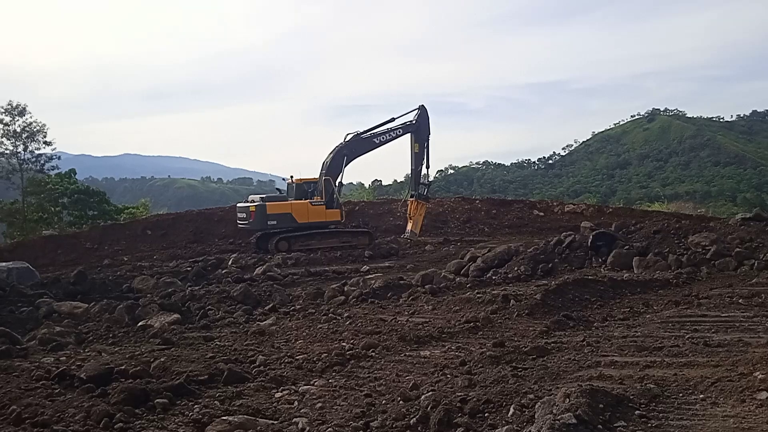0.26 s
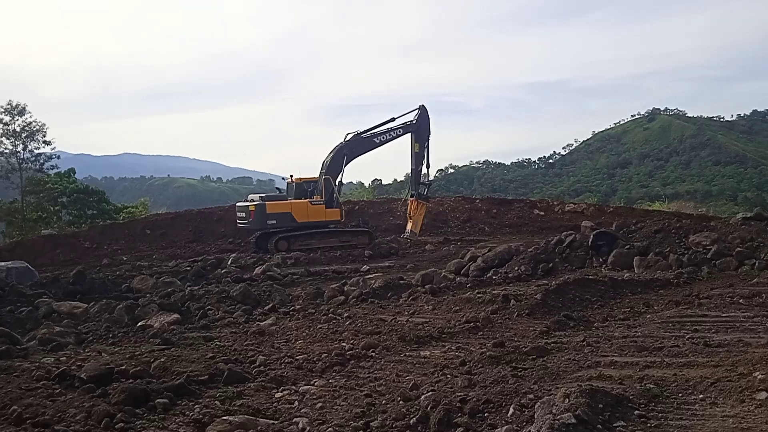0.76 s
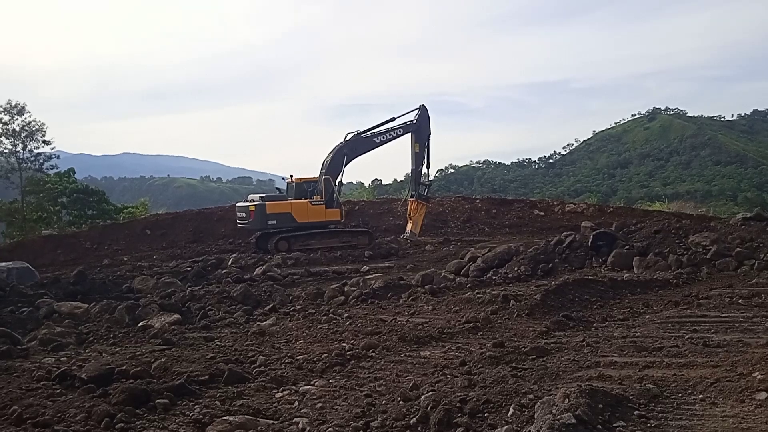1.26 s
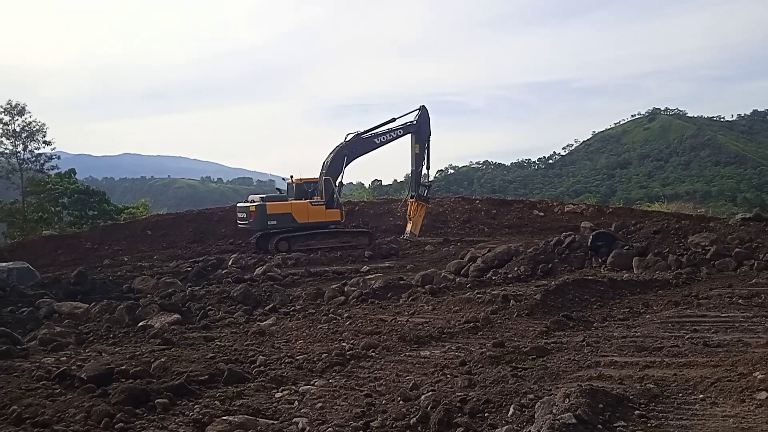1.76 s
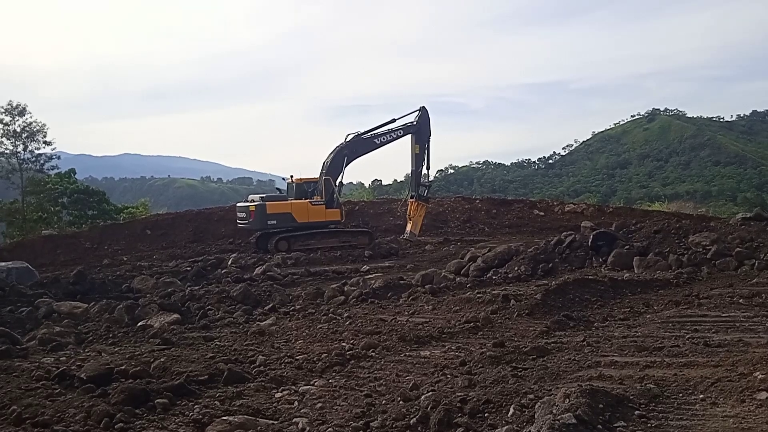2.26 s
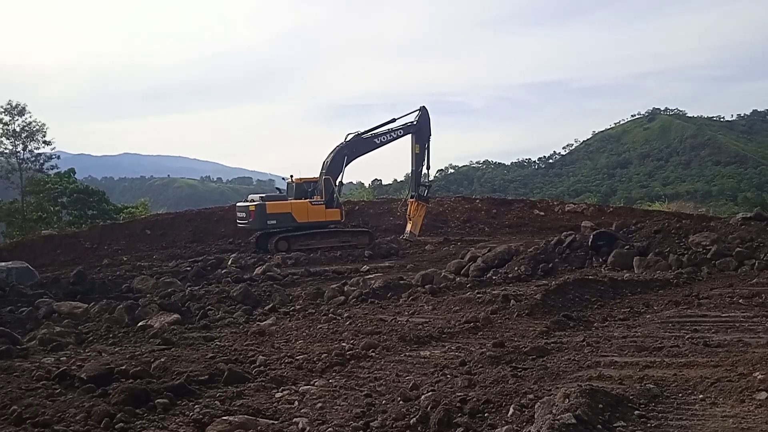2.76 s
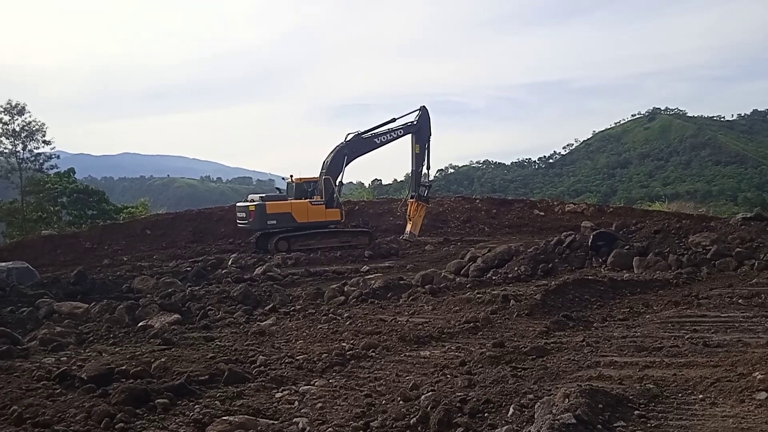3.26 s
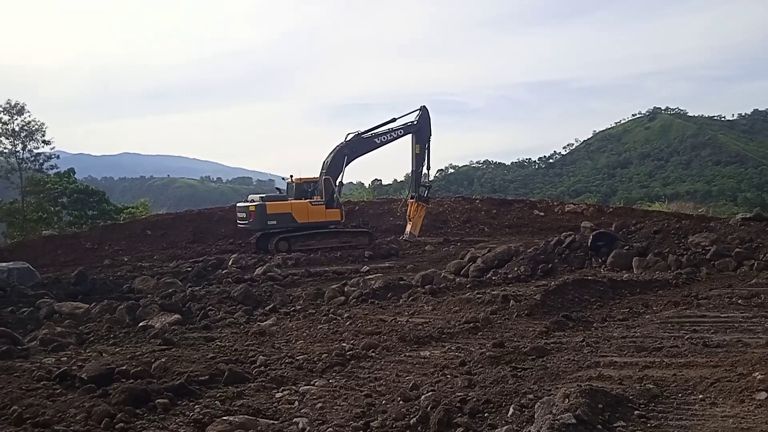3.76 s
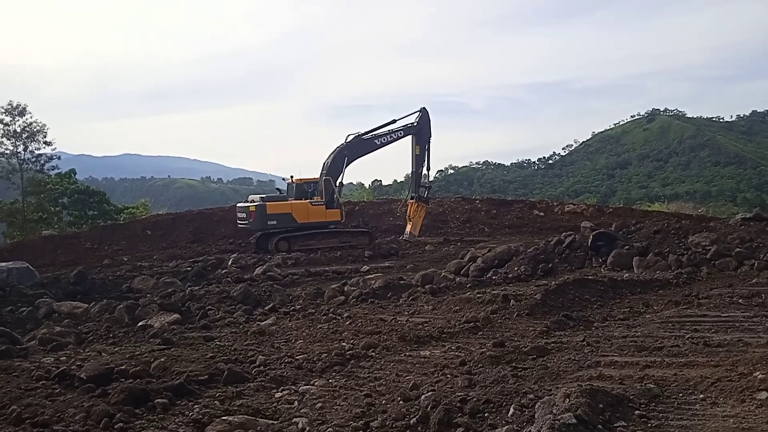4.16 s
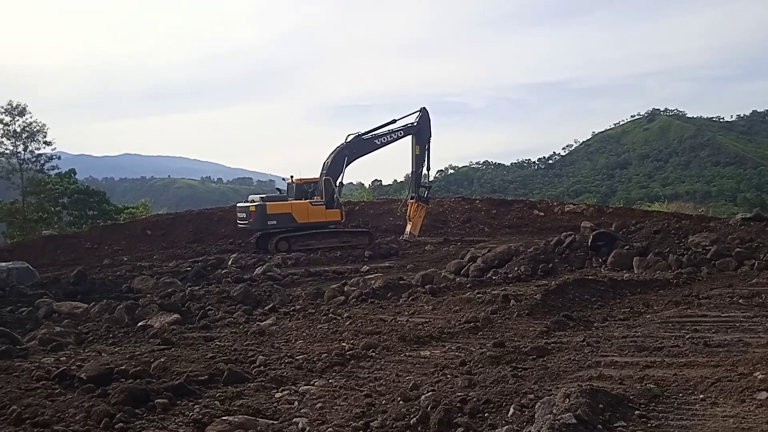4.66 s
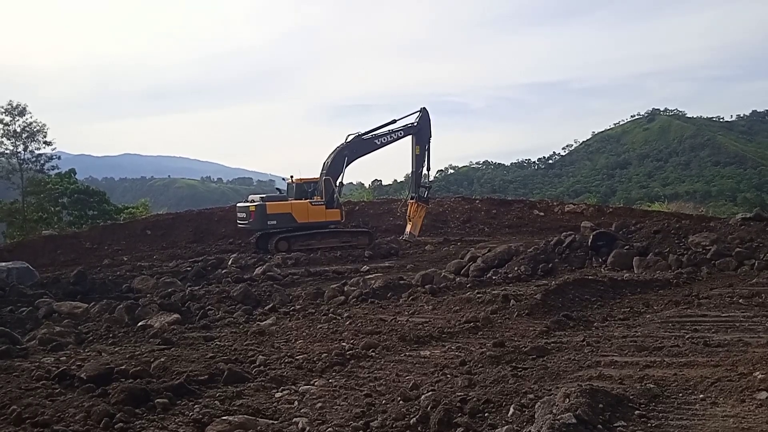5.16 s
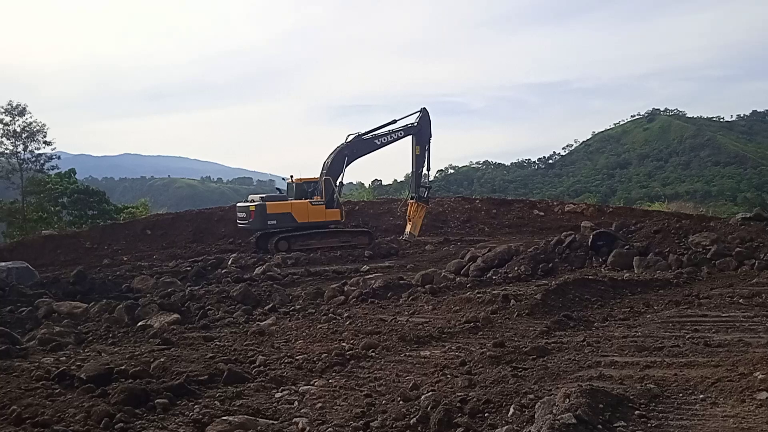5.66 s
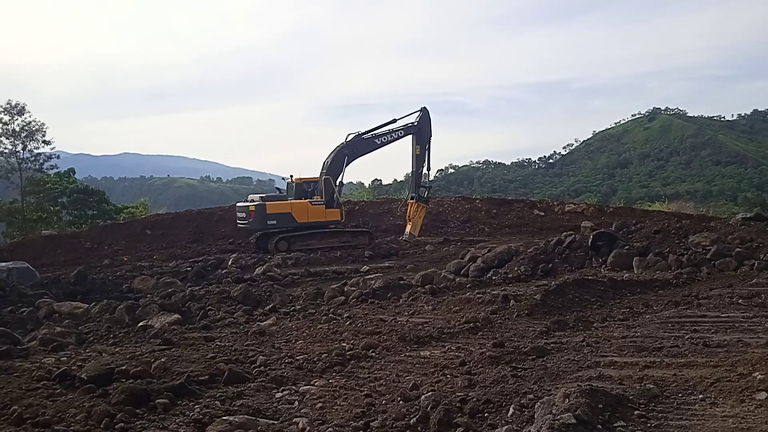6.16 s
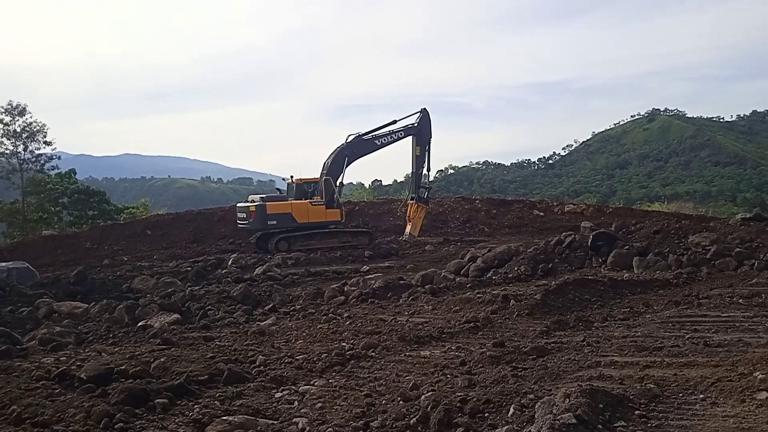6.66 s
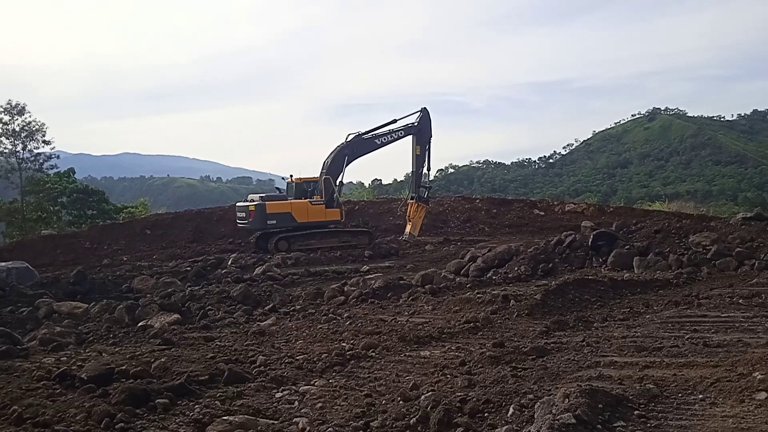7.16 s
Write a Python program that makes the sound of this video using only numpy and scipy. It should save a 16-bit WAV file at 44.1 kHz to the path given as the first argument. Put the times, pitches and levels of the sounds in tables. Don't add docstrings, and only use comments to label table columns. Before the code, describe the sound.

Outdoors at a rocky earthworks site, an excavator's hydraulic breaker pounds rock at about eight hard, ringing blows a second. The chisel soon works loose, adding double knocks, clanks and bright pings. Just past four seconds the hammering gives way to lone steel knocks, then resumes to the end. A low diesel drone runs throughout. A small microphone at some distance picks up faint, dull echoes and little deep bass.

```python
import sys
import numpy as np
from scipy import signal
from scipy.io import wavfile
from scipy.ndimage import uniform_filter1d

SR = 44100
rng = np.random.default_rng(int(sys.argv[2]) if len(sys.argv) > 2 else 0)


def nominal_scale(level):
    x = np.asarray(level, float) / 20
    return 10 ** x


def generate_wav(sig):
    pcm = np.round(np.clip(np.atleast_2d(sig).T, -1, 1) * 32767).astype(np.int16)
    wavfile.write(sys.argv[1], SR, pcm)


N = 326781
LENGTH = round(.26 * SR)
EDGES_HZ = 35 * 2 ** (np.arange(28) / 3)

# start_s, blow_count, spacing_s
BLOW_RUNS = [
    (.048, 7, .1302),
    (.959, 7, .1293),
    (1.865, 5, .1297),
    (2.513, 14, .1306),
    (4.948, 2, .13),
    (5.215, 5, .1293),
    (5.861, 13, .12863),
]
# time_s, strength_db, edge_db (re strength), boom_db (re strength)
CHISEL_BITE = [(0, -25.5, -3, -11), (.7, -25.5, -1.5, -10.5), (1.2, -26.5, -1, -1.5),
               (1.7, -24.5, -2, -5.5), (2.1, -26.5, -2.5, -3), (2.45, -23, -4.5, -6.5),
               (2.75, -27.5, -4, -15.5), (3.15, -25.5, -3.5, -8.5), (3.7, -25.5, -2.5, -5.5),
               (4.25, -26.5, -5.5, -4), (4.95, -28, -1.5, -7.5), (5.15, -29.5, 1, 0),
               (5.5, -28.5, -1.5, -3), (5.85, -29, 1.7, -3), (6.4, -29, -0.5, -6.5),
               (6.75, -30, -2.3, -6.5), (7.05, -30, -4.5, -6.5), (7.41, -23.5, -5.5, -8)]
UNEVEN_DB = 1.25
# pitch_hz, level_db (per Hz)
BLOW_COLOUR = [(76, -30), (130, 15), (263, -9.5), (501, -2.5), (678, -17), (954, 5.5), (1100, -35),
               (1320, 2), (2090, -4), (2460, -2.5), (3750, -7), (4320, -18), (6600, -9), (10100, -26),
               (16000, -27.5)]
# pitch_hz, hold_s, t60_s
BLOW_SUSTAIN = [(150, 0.029, 0.24), (503, 0.013, 0.73), (926, 0.02, 0.23), (2020, 0.014, 0.14),
                (4100, 0.016, 0.18), (8050, 0.0052, 0.12), (15900, 0.0043, 0.15)]
# pitch_hz, width_hz, level_db
HOUSING_MODES = [(987, 24, 5), (1190, 20, -2), (1340, 32, 3), (1520, 50, -1), (1930, 40, -6),
                 (2263, 20, -4), (2397, 26, 7), (2550, 26, -3), (2870, 60, -9), (3260, 38, -7),
                 (3480, 220, -6), (3710, 45, -1), (4150, 40, -8), (4740, 33, -8), (5070, 100, -9),
                 (5510, 40, 2), (6400, 45, -3), (6540, 50, -5), (6930, 40, -8), (7250, 70, -6),
                 (8830, 60, -5), (9310, 50, -2)]
# pitch_hz, level_db, t60_s
GROUND_MODES = [(96.5, 3, 0.13), (127.5, -2, 0.13), (142.4, -2.5, 0.1), (157.8, 2.5, 0.11),
                (198, -15, 0.24)]
# pitch_hz, level_db, t60_s
PLATE_MODES = [(346, 1.5, 0.25), (395.2, -0.5, 0.23), (428.8, 7, 0.14), (455.7, 1.5, 0.12),
               (543.6, -3, 0.25)]
# pitch_hz, level_db, t60_s
ARM_MODES = [(501.9, 0, 0.41)]
# time_s, ground_db, plates_db, arm_db
SEAT_SHARES = [(0, -9, -11, 2), (.35, -36, -2, -2.5), (.8, -2, -5, -7.5), (1.25, -0.5, -41, -3),
               (1.8, -4.5, -14, -15), (2.2, 1.5, -15, -15), (2.8, 8, 4.5, 6), (3.4, 3.5, -5.5, -14),
               (3.9, -2.5, -9.5, -4), (4.25, 2, -13, -4.5), (4.95, 0, -8.5, 0.5), (5.3, -4.5, -14, -11),
               (6.0, -7, -7.5, -6), (6.6, 1, -5.5, -14), (6.9, -15, -3.5, 0), (7.41, -9, -11, 1)]

# pitch_hz, level_db (per Hz)
VALVE_COLOUR = [(880, -9), (1500, -8), (3280, -8.5), (4480, -18.5), (7320, -6.5), (15500, -41), (16500, 13)]
VALVE_LEAD_S, VALVE_DB, VALVE_SCATTER_DB = .028, -47, 1.2
# time_s, level_db
REBOUND_HITS = [(.083, -36), (2.418, -47), (2.548, -34.5), (2.679, -29.5), (3.071, -47), (3.201, -45),
                (3.333, -27.5), (3.463, -41), (3.593, -31.5), (3.723, -26.5), (3.854, -31), (3.984, -34),
                (4.116, -34.5), (4.246, -32)]
# time_s, peak_db
LONE_KNOCKS = [
    (2.2243, -26.5),
    (2.8531, -26.5),
    (3.4639, -22),
    (4.411, -25),
    (4.568, -25.5),
    (4.7581, -43),
    (4.795, -26.5),
    (4.8994, -55),
    (5.1897, -34),
]
# pitch_hz, level_db (per Hz)
KNOCK_COLOUR = [(180, -35), (300, -15), (460, -1.5), (800, -2), (2480, -2.5), (4390, -7.5), (6030, -3),
                (9980, -19.5), (12500, -28), (16500, -16)]
# pitch_hz, level_db, t60_s
LOOSE_PLATE = [(615, 3, 0.59), (1347, -1, 0.68), (2450, -6, 0.22), (3070, 5, .25)]
# pitch_hz, t60_s
PIN_MODES = [(3250, .23), (5915, .17), (9310, .09)]
# time_s, low_mode_db, middle_mode_db, high_mode_db
PIN_HITS = [(2.222, -37, -28.5, -63), (2.29, -44, -53, -87), (2.42, -55, -38, -60), (2.55, -37, -35, -63),
            (2.689, -36, -35, -59), (2.931, -40, -46, -50), (3.06, -44, -51, -44), (3.256, -39, -42, -65),
            (3.34, -31, -37, -68), (3.378, -37, -60, -70), (3.466, -43, -31, -60), (3.601, -42, -33, -58),
            (3.711, -30.5, -30, -62), (3.799, -27.5, -40, -61), (3.861, -50, -34, -58),
            (3.89, -31, -55, -65), (3.985, -35, -37, -62), (4.12, -67, -36, -62), (4.252, -38, -41, -52),
            (4.409, -45, -33, -62), (4.567, -52, -33, -46), (4.793, -48, -40, -57)]
# pitch_hz, level_db, t60_s
LINK_MODES = [(4307, 2, 0.27), (6400, 3, 0.15), (7445, 2, 0.38), (8300, 7.5, 0.14), (8730, -7, 0.11),
              (11000, -5.5, 0.25), (11420, -7, 0.32), (13300, -10, .25), (13750, -4, 0.28),
              (14230, -11, .25), (14790, -7, 0.48), (15400, -14, .2)]
# time_s, level_db
LINK_STRIKES = [
    (3.258, -61),
    (3.34, -58),
    (3.757, -39.5),
    (3.80, -51),
    (3.869, -52),
    (4.25, -61),
]
# pitch_hz, level_db, t60_s
COLLAR_MODES = [(5510, 0, .13)]
# time_s, level_db
COLLAR_STRIKES = [(0.584, -46), (0.843, -49), (.975, -39), (2.65, -48), (2.786, -32), (3.045, -31),
                  (3.18, -29), (3.572, -29), (5.09, -47), (6.639, -32), (7.044, -37)]
CHATTER_DB = 1.6
# time_s, level_db
GRIT_LEVEL = [(0, -47), (3.2, -52), (3.35, -52), (3.75, -41.5), (4.2, -50.5), (4.35, -57), (7.41, -54)]

# time_s, firing_hz
ENGINE_SPEED = [(0, 74.3), (.3, 78.2), (.6, 80.5), (1.0, 85.05), (1.3, 84.3), (1.6, 81.7), (2.05, 80.34),
                (2.5, 82), (2.9, 85.6), (3.2, 86.2), (3.6, 83.66), (4.1, 81.5), (4.4, 84.76), (4.95, 89),
                (5.2, 88.8), (5.5, 88), (6.8, 89.1), (7.41, 89.2)]
# pitch_hz, level_db (rms)
EXHAUST_PIPE = [(80, -39), (152, -45), (168, -49), (177, -42), (228, -48), (243, -45), (256, -58.5),
                (266, -51.5)]
FUEL_DB_PER_HZ_S = 0.2359
# pitch_hz, level_db (per Hz)
ROAR_COLOUR = [(18, -48), (30, -36), (53, -6.5), (100, -6.5), (273, -10), (328, -20.5), (1130, -28),
               (1330, -22), (1550, -51), (2900, -27), (3310, -35), (3580, -54), (6050, -32), (6720, -43),
               (10000, -55), (16000, -52)]
# time_s, level_db
ROAR_LEVEL = [(0, -34.5), (1.0, -41.5), (2.0, -43), (3.0, -39.5), (4.3, -42), (5.0, -40.5), (6.0, -39.5),
              (7.41, -42)]
# time_s, pitch_hz, level_db
TURBO_WHINE = [(0, 9660, -71), (2.2, 9650, -73), (2.6, 9650, -88), (4.5, 9750, -84), (7.41, 9750, -88)]
# pitch_hz, width_hz, gain_db
MICROPHONE_PORT = [(12900, 2600, -7), (15200, 1600, 5)]


def in_time(rows):
    s, *columns = np.transpose(rows)
    return [np.interp(np.arange(N) / SR, s, column) for column in columns]


def at_times(rows, s):
    return [column[(s * SR).astype(int)] for column in in_time(rows)]


def at_hz(points, hz, axis=1):
    table = np.array(points)
    return np.interp(np.log(hz), np.log(table[:, 0]), table[:, axis])


def rms_one(x):
    return x / np.sqrt(np.mean(x ** 2) + 1e-20)


def drift(rate):
    r = np.exp(-80 * np.pi * rate / SR)
    noise = rng.standard_normal(N // 40 + 2002)
    slow = signal.lfilter([1], [1, -2 * r, r * r], noise)[2000:]
    return np.interp(np.arange(N) / 40, np.arange(len(slow)), rms_one(slow))


def creeping(count, *shape, alike):
    alike = np.clip(alike, 0, .98)
    fresh = rng.standard_normal((count + 10, *shape))
    return signal.lfilter([np.sqrt(1 - alike ** 2)], [1, -alike], fresh, axis=0)[10:]


def bands(x, low_hz):
    for k, (low, high) in enumerate(zip(EDGES_HZ, EDGES_HZ[1:])):
        if low > low_hz:
            band_pass = signal.butter(2, [low, high], "band", fs=SR, output="sos")
            yield np.sqrt(low * high), signal.sosfilt(band_pass, x[k % 2])


def envelope(rise, hold, t60):
    t = np.arange(LENGTH) / SR
    late = 0.0068 * np.logaddexp(0, (t - hold) / 0.0057)
    return (1 - np.exp(-t / rise)) * nominal_scale(-60 * late / t60)


def place(times, sounds):
    out = np.zeros(N + 2 * LENGTH)
    for s, sound in zip(times, sounds):
        at = max(round(s * SR), 0)
        out[at:at + LENGTH] += sound
    return out[:N]


def resonate(x, modes, spread_db):
    out = 0
    lucks = creeping(x.shape[-2], len(modes), alike=.55).T
    for (hz, width_hz, level_db), luck in zip(modes, lucks):
        r = np.exp(-np.pi * width_hz / SR)
        ringing = signal.lfilter([1, 0, -1], [1, -2 * r * np.cos(2 * np.pi * hz / SR), r * r], x)
        gain = nominal_scale(level_db + spread_db * luck)[:, None]
        out = out + gain * (1 - r * r) / 2 * ringing
    return out


def knocks(times, level_db, colour, hold, t60):
    noise = rng.standard_normal((2, len(times), LENGTH))
    parts = [(hz, nominal_scale(at_hz(colour, hz)) * band) for hz, band in bands(noise, colour[0][0])]
    whole = np.sqrt(np.mean(sum(part for hz, part in parts) ** 2))
    dying = sum(part * envelope(.001, hold, t60 * (3000 / hz) ** .6) for hz, part in parts)
    return place(times, nominal_scale(level_db)[:, None] * dying / whole)


def struck(times, level_db, modes, spread_db, alike, rise):
    t = np.arange(LENGTH) / SR
    hz, mode_db, t60 = np.transpose(modes)[:, :, None]
    twins = np.sin(2 * np.pi * hz * t) + .45 * np.sin(2 * np.pi * hz * 1.005 * t)
    dying = nominal_scale(mode_db - 60 * t / np.clip(t60, .03, .45))
    rings = twins * dying * (1 - np.exp(-t / rise))
    luck = creeping(len(times), len(modes), alike=alike)
    return place(times, nominal_scale(np.array(level_db)[:, None] + spread_db * luck) @ rings)


def strokes():
    s = np.concatenate([first + pace * np.arange(count) for first, count, pace in BLOW_RUNS])
    strength_db, edge_db, boom_db = at_times(CHISEL_BITE, s)
    strength_db = strength_db + UNEVEN_DB * rng.standard_normal(len(s))
    return np.array([s, strength_db, edge_db, boom_db])


def rattle(count, alike, lumps_db):
    lumps = uniform_filter1d(creeping(count, LENGTH, alike=alike), size=90, axis=-1)
    noise = creeping(count, 2, LENGTH, alike=alike).transpose(1, 0, 2)
    return noise * nominal_scale(lumps_db * rms_one(lumps))


def blows(hits):
    s, strength_db, edge_db, boom_db = hits[:, :, None]
    contact = rattle(count=len(s), alike=.75, lumps_db=2)
    contact = contact + nominal_scale(8) * resonate(contact, HOUSING_MODES, spread_db=2)
    contact = contact * (1 - .5 * np.exp(-np.arange(LENGTH) / SR / .009))
    out = 0
    for hz, band in bands(contact, low_hz=200):
        bright_db = np.clip(np.log2(hz / 3500), 0, 1) * (edge_db + 6.5)
        deep_db = np.clip(np.log2(900 / hz), 0, 1) * (boom_db + 7.0)
        hold, t60 = at_hz(BLOW_SUSTAIN, hz), at_hz(BLOW_SUSTAIN, hz, axis=2)
        shape = envelope(0.00095 + 0.5 / hz, hold, t60)
        early = np.std(band[:, :round(.04 * SR)], axis=1, keepdims=True)
        band = band * (early.mean() / early) ** .7
        out = out + nominal_scale(at_hz(BLOW_COLOUR, hz) + bright_db + deep_db) * shape * band
    out = out / np.sqrt(np.mean(out[:, :round(.03 * SR)] ** 2))
    return place(s[:, 0], nominal_scale(strength_db - 0.5) * out)


def boom(hits):
    s, strength_db, edge_db, boom_db = hits
    out = 0
    for share_db, modes in zip(at_times(SEAT_SHARES, s), (GROUND_MODES, PLATE_MODES, ARM_MODES)):
        level_db = strength_db + boom_db + share_db
        out = out + struck(s + 0.00623, level_db, modes, spread_db=3.0, alike=0.6, rise=0.0084)
    return out


def valve_ticks(s):
    level_db = VALVE_DB + VALVE_SCATTER_DB * rng.standard_normal(len(s))
    return knocks(s - VALVE_LEAD_S, level_db, VALVE_COLOUR, hold=0.0053, t60=0.23)


def rebounds():
    return knocks(*np.transpose(REBOUND_HITS), KNOCK_COLOUR, hold=0.0023, t60=0.25)


def lone_knocks():
    at, peak_db = np.transpose(LONE_KNOCKS)
    dry_part = knocks(at, peak_db - 8.0, KNOCK_COLOUR, hold=0.0025, t60=0.21)
    return dry_part + struck(at, peak_db - 24.5, LOOSE_PLATE, spread_db=4.0, alike=0, rise=.004)


def loose_rings():
    at, *mode_levels = np.transpose(PIN_HITS)
    pin = 0
    for level_db, (hz, t60) in zip(mode_levels, PIN_MODES):
        modes = [(hz, 0, t60), (1.1 * hz, -5, .05)]
        pin = pin + struck(at, level_db, modes, spread_db=1.5, alike=0, rise=0.0041)
    link = struck(*np.transpose(LINK_STRIKES), LINK_MODES, spread_db=2, alike=0, rise=.003)
    collar = struck(*np.transpose(COLLAR_STRIKES), COLLAR_MODES, spread_db=0, alike=0, rise=.003)
    return nominal_scale(CHATTER_DB * drift(49)) * (pin + link + collar)


def grit():
    sizes = nominal_scale(3 * np.minimum(rng.exponential(1, N), 5)) * rng.choice([-1, 1], N)
    grains_per_s = 5000 * nominal_scale(4 * drift(25))
    grains = sizes * (rng.random(N) < grains_per_s / SR) + 1e-18
    stony = signal.sosfilt(signal.butter(3, [500, 2300], "band", fs=SR, output="sos"), grains)
    return nominal_scale(in_time(GRIT_LEVEL)[0]) * rms_one(stony)


def slope_echo(x):
    dull = signal.sosfilt(signal.butter(1, 3000, fs=SR, output="sos"), x)
    out = np.zeros(N)
    for delay_s in (0.071, .092):
        late = round(delay_s * SR)
        out[late:] += nominal_scale(-26.0) * dull[:N - late]
    return out


def exhaust(hz, phase):
    gaining = uniform_filter1d(np.gradient(hz) * SR, size=8000)
    out = 0
    for k in range(3):
        level_db = at_hz(EXHAUST_PIPE, (k + 1) * hz) + k * FUEL_DB_PER_HZ_S * gaining
        wavering = nominal_scale(level_db - 1 + 1.3 * drift(10))
        out = out + np.sqrt(2) * wavering * np.sin((k + 1) * phase + k)
    return out


def engine_roar(phase):
    white = rng.standard_normal((2, N))
    together = drift(2.6)
    roar = 0
    for hz, band in bands(white, low_hz=30):
        roar = roar + nominal_scale(at_hz(ROAR_COLOUR, hz) + together + 1.5 * drift(15)) * band
    throb = 1 + 0.037 * np.cos(phase)
    return nominal_scale(in_time(ROAR_LEVEL)[0] - 1.0) * rms_one(roar * throb)


def turbo_whine():
    hz, level_db = in_time(TURBO_WHINE)
    phase = 2 * np.pi * np.cumsum(hz + 15 * drift(48)) / SR
    return nominal_scale(level_db + 1.8 * drift(29)) * np.sin(phase)


def engine():
    hz, = in_time(ENGINE_SPEED)
    phase = 2 * np.pi * np.cumsum(hz + 0.412 * drift(6.56)) / SR
    return exhaust(hz, phase) + engine_roar(phase) + turbo_whine()


def scene():
    hits = strokes()
    loose_parts = valve_ticks(hits[0]) + rebounds() + lone_knocks() + loose_rings()
    breaker = blows(hits) + boom(hits) + loose_parts + grit()
    return (breaker + slope_echo(breaker) + engine())[None]


def low_pass(x):
    return signal.sosfilt(signal.butter(12, 17000, fs=SR, output="sos"), x)


def record(dry):
    x = signal.sosfilt(signal.butter(2, 55, "high", fs=SR, output="sos"), dry)
    for hz, width_hz, gain_db in MICROPHONE_PORT:
        x = x + (nominal_scale(gain_db) - 1) * signal.lfilter(*signal.iirpeak(hz, hz / width_hz, fs=SR), x)
    top_cut = signal.sosfilt(signal.cheby2(12, 26, 15950, fs=SR, output="sos"), x)
    return low_pass(top_cut)


dry = scene()
out = record(dry)
generate_wav(out)
```